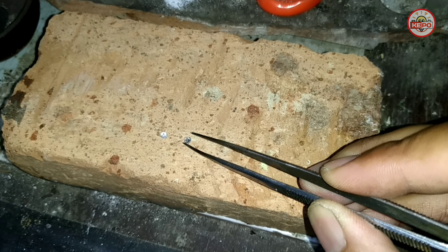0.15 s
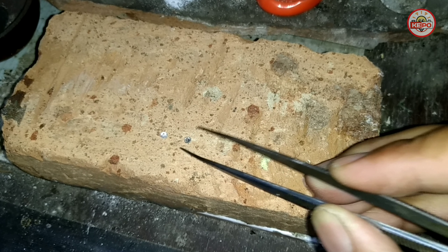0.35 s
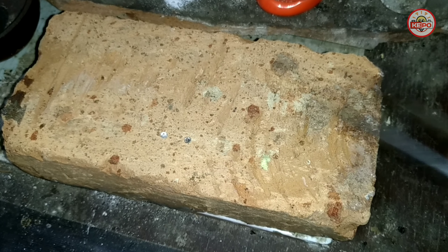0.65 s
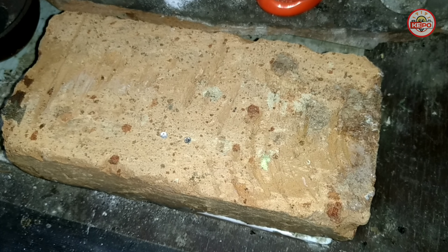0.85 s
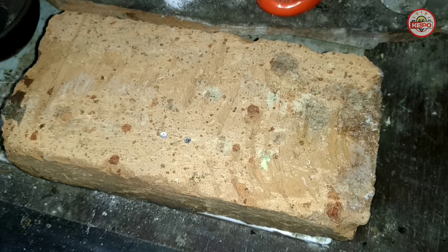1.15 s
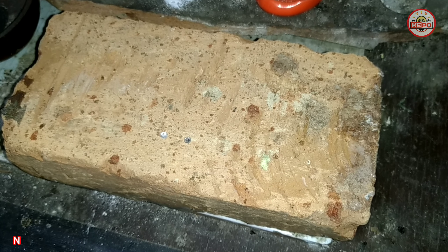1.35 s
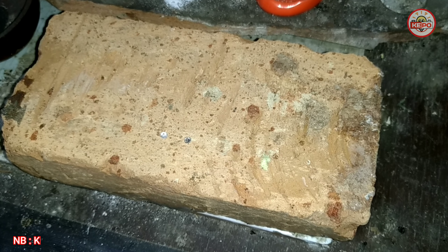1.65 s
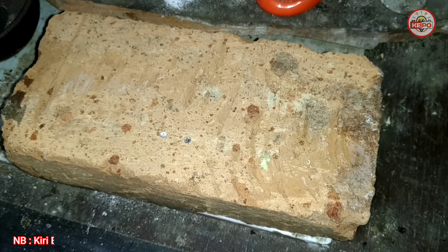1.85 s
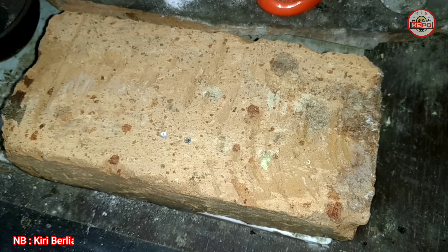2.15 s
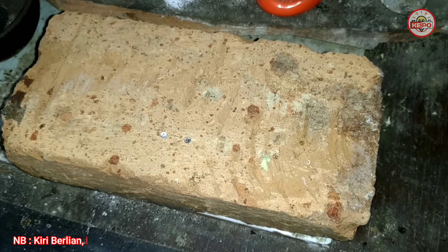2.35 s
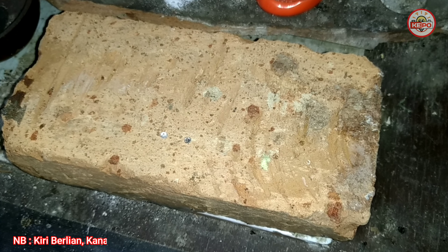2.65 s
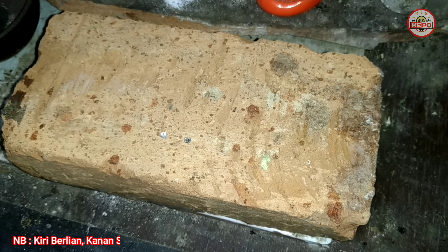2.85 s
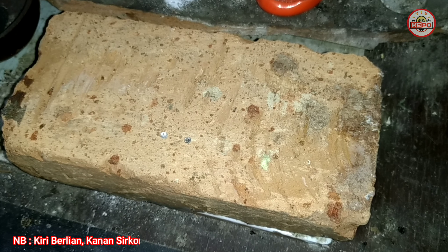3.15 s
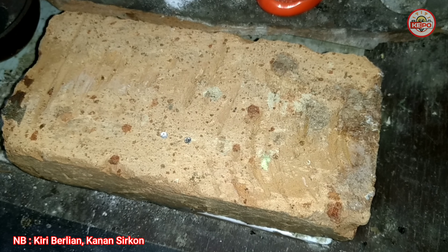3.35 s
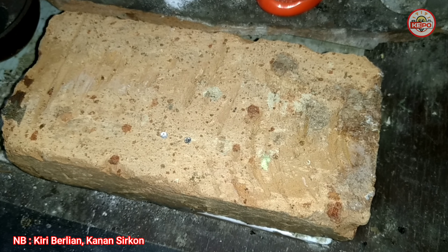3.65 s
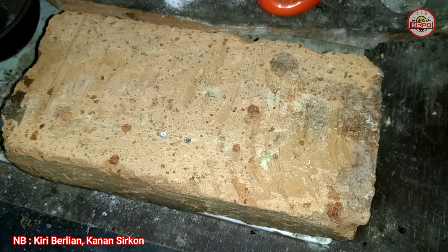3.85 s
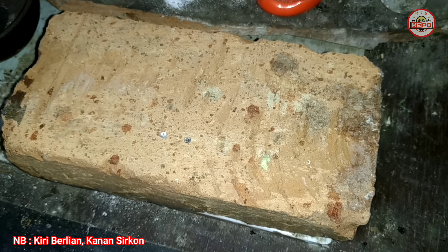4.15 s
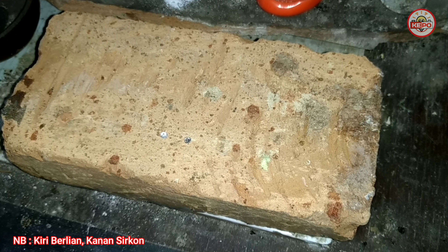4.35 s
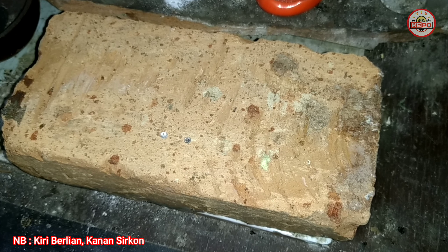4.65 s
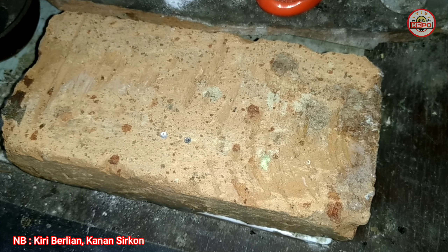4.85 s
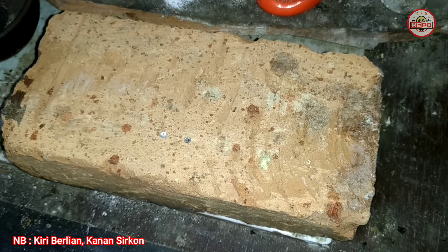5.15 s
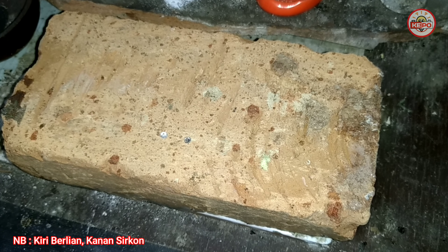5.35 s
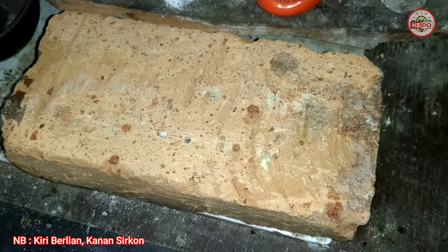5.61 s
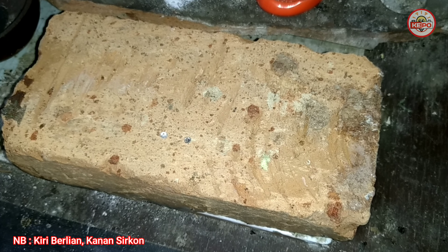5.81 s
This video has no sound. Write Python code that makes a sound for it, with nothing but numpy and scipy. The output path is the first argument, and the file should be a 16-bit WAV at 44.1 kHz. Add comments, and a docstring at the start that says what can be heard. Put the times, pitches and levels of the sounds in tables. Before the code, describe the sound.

Close up in a small room, metal tweezers land on a bench, clattering brightly and settling in a few dull taps. Quiet handling follows: scattered ticks, low bumps and the brush of hands. An object rubs unevenly along the bench and ends in a hollow wooden knock. Near the end, faint metallic pings and rustling sound over a rising low hum and rumble.

```python
"""Steel tweezers laid down on a workbench beside a brick: they clatter, bounce and rock to rest, each
contact ringing steel and bench together. Hands then shift small things about with clicks, soft bumps
and rustling; something slides, rubbing unevenly, and stops with a knock that sets metal ringing.
Heard from a close pair of microphones in a small room, with a low hum that swells near the end."""
import sys
import numpy as np
from scipy import signal
from scipy.fft import irfft, next_fast_len
from scipy.io import wavfile
from scipy.ndimage import uniform_filter1d

SR = 44100
rng = np.random.default_rng(int(sys.argv[2]) if len(sys.argv) > 2 else 0)


def to_wav(s):
    """Save 16-bit WAV."""
    ch = np.atleast_2d(s).T  # columns
    pcm = np.round(np.clip(ch, -1, 1) * 32767)  # PCM
    wavfile.write(sys.argv[1], SR, pcm.astype(np.int16))


N = 263718
TIME, HZ = np.arange(N) / SR, np.fft.rfftfreq(next_fast_len(N, True), 1 / SR)
BANDS_HZ, TOP_HZ = np.geomspace(60, 15000, 24), 15750

# The tweezers land, tips first, then flat; ring_factor shortens the ringing while fingers hold on:
# start_s, level_db, tilt_db_per_octave, t60_s, ring_db, ring_factor
LANDINGS = [(.3565, -20, -4, 0.071, -32, 0.45), (.3652, -25.5, -4.5, .11, -28, 0.69),
            (.371, -33, 4.5, 0.056, -47, 0.64), (.3775, -34, 3, 0.18, -37, 1),
            (.591, -40.5, -0.5, 0.079, -54, .55), (.606, -51, -2.5, 0.028, -34, 0.29),
            (.6135, -38, 5, 0.07, -33.5, 0.82), (.631, -41.5, 4.5, 0.093, -37, 0.45)]
# Crack of steel on the bench: frequency_hz, density_db
CLACK_COLOUR = [(60, -12.5), (130, -1.5), (250, -13), (370, 3), (620, -2.5), (1050, -6.5), (1700, -3),
                (2600, -15.5), (3300, -12.5), (4700, -25), (5700, -36.5), (8000, -61), (11000, -36),
                (15000, -58)]
# Bench and tweezers ringing together: pitch_hz, level_db, t60_s
CLATTER_MODES = [(371, -1.5, 0.065), (501, -21, 0.17), (588, -4.5, 0.2), (699, -1, 0.19), (791, 1, 0.18),
                 (892, -2.5, 0.16), (1175, -1, 0.06), (1313, -4, 0.15), (1390, -8.5, 0.19),
                 (1636, -1, 0.18), (1740, -2.5, 0.13), (1896, -12.5, 0.29), (1960, -13, 0.18),
                 (2360, -37, 0.28), (3080, -30, 0.12), (3120, -15, 0.16), (3010, -32, 0.15),
                 (3456, -17, 0.1), (4400, -44, .12)]


def tweezers(bands):
    """Close up and a little left, each bounce cracks against the bench and rings its modes."""
    out = np.zeros((2, N))
    octaves = np.log2(np.minimum(BANDS_HZ, 4500) / 1000)
    for start_s, db, tilt, t60, ring_db, ring_factor in LANDINGS + rocking():
        contact_s = 0.0002 * amp(-.7 * (db + 22.5))  # gentle contacts last longer
        gains = amp(db) * band_gains(read(CLACK_COLOUR, BANDS_HZ) + tilt * octaves)
        add(out, start_s, burst(bands, start_s, gains, t60, room_db=-21, rise_s=contact_s))
        modes = [(hz, mode_db + tilt * np.log2(hz / 1200), ring_s * ring_factor)
                 for hz, mode_db, ring_s in CLATTER_MODES]
        add(out, start_s, amp(ring_db) * ring(modes, rise_s=contact_s, scatter=0.97))
    bass_cut = signal.butter(2, 70.4, "highpass", fs=SR, output="sos")
    return signal.sosfilt(bass_cut, out) * lean_left(db=1.3)


# The tweezers settle on the bench top: start_s, strength_db
ROCK_CONTACTS = [(.654, 3.5), (.691, -2), (.732, -6.5), (.773, -4.5), (.809, -4)]


def rocking():
    """The tweezers rock to rest in light, dull contacts, given as rows like the landings."""
    tilt, t60, ring_factor = -3, .08, 0.72
    return [(start_s, db - 49.5, tilt, t60, db - 45, ring_factor) for start_s, db in ROCK_CONTACTS]


# Modes of steel tips, arms, rod and plate, and of a hollow cap and shell: pitch_hz, level_db, t60_s
TIP_MODES = [(4240, -2.5, 0.032), (4430, -4.5, 0.04), (7180, -34, 0.12)]
ARM_MODES = [(770, -3, 0.55), (855, -13, 0.76), (3130, 1, 0.079), (3990, -16.5, 0.51)]
ROD_MODES = [(4260, 0, 0.2), (4320, -5.5, 0.21), (6500, -7, 0.17), (9600, -11, 0.13)]
PLATE_MODES = [(2053, 2.5, 0.25), (2677, -1, 0.22), (3100, .5, 0.22), (3750, -9, 0.21), (4840, -5.5, 0.21)]
CAP_MODES = [(452, -7, 0.062), (1130, -17, 0.066), (3460, 1.5, 0.017), (5120, 0, 0.021)]
SHELL_MODES = [(1620, 2, 0.1), (2240, -9, .07), (2900, -15, 0.056), (4070, -4, 0.029)]
# Things left ringing on the bench: start_s, thing, level_db
PING_STRIKES = [(.372, "tips", -24.5), (.613, "arms", -37.5), (2.3305, "shell", -44.5),
                (3.3298, "cap", -34), (3.531, "shell", -45.5), (4.05, "rod", -61.5), (4.648, "rod", -47.5),
                (5.179, "plate", -61), (5.277, "plate", -67.5), (5.426, "plate", -50)]


def pings():
    """Struck steel and hollow things ring on in their own modes, a little left of centre."""
    modes = {"tips": TIP_MODES, "arms": ARM_MODES, "rod": ROD_MODES,
             "plate": PLATE_MODES, "cap": CAP_MODES, "shell": SHELL_MODES}
    out = np.zeros((2, N))
    for start_s, thing, db in PING_STRIKES:
        add(out, start_s, amp(db) * ring(modes[thing], rise_s=0.0011, scatter=1))
    return out * lean_left(db=1.5)


# The hollow wooden stop: pitch_hz, level_db, t60_s
STOP_MODES = [(85.2, -30.5, 0.34), (189.7, -30.5, 0.33), (282, -33, 0.049), (342, -1, 0.037),
              (319, -34.5, 0.37), (403.5, -27, 0.19), (511, -12, 0.042), (604, -34, 0.063),
              (821, -36, 0.11), (906, -34, 0.1)]
# Its reflections in the room: frequency_hz, density_db
WASH_COLOUR = [(60, 4), (130, -5.5), (240, 2), (420, -2), (700, -12.5), (950, -15), (1350, -26),
               (3000, -29.5), (5000, -35), (8000, -51), (15000, -73)]


def knock(bands, start_s):
    """The slide ends against a hollow stop; reflections thicken just after the blow."""
    out = np.zeros((2, N))
    add(out, start_s, ring(STOP_MODES, rise_s=0.0054, scatter=0, spread=.6))
    wash_s = start_s + .005
    gains = amp(-20.5) * band_gains(read(WASH_COLOUR, BANDS_HZ))
    add(out, wash_s, burst(bands, wash_s, gains, t60=.105, room_db=-15, rise_s=.009))
    return out


# Something pushed along the bench: start_s, end_s, level_db
PUSHES = [(4.03, 4.14, -59.5), (4.19, 4.3, -61), (4.3, 4.65, -52)]
# Resonances of the sliding thing: pitch_hz, width_hz, level_db
FRICTION_PEAKS = [(434, 100, 0), (776, 280, -12.5), (1142, 94, -2), (1650, 850, -17.5), (2315, 89, -6.5),
                  (3120, 2900, -25.5)]


def slide():
    """Uneven friction sings in a few resonances; a firmer grip is louder and slightly higher."""
    colour = sum(amp(db) * peak(hz, width) for hz, width, db in FRICTION_PEAKS)
    rub = noises([colour])[0]
    grip = wander(samples=1500)
    position = np.cumsum(1 + 0.0151 * grip)
    bent = np.array([np.interp(position, np.arange(N), side) for side in rub])
    return bent * strokes(PUSHES, rise=0.42, fall=0.12) * amp(1.04 * grip)


# Small things shifted near the microphones:
# start_s, level_db, tilt_db_per_octave, t60_s, pitch_hz, ring_db
TOUCHES = [(1.2455, -55.5, 0, 0.023, 3105, -51), (2.279, -59, -6, 0.19, 367, -33.5),
           (2.329, -49.5, -1.6, 0.028, 1536, -45), (2.4285, -66.5, 0.5, 0.079, 1570, -59),
           (3.117, -63.5, -3, 0.21, 1218, -45.5), (3.329, -49.5, 0.3, .05, 3000, -48.5),
           (3.385, -68.5, -6, 0.022, 693, -40), (3.4277, -60.5, -2.5, 0.058, 2674, -54),
           (3.531, -52.5, -1.5, .1, 1543, -40.5), (3.872, -65, -8, 0.18, 430, -47),
           (4.048, -59, -3.5, 0.24, 709, -40.5), (4.164, -65, -7, 0.25, 437, -62),
           (5.1183, -61.5, -6, 0.13, 758, -43), (5.179, -65.5, 1, 0.1, 3900, -58),
           (5.4242, -55.5, 1.5, 0.15, 3740, -49), (5.9508, -59.5, -4.5, .09, 680, -47)]
# Noise of one light contact: frequency_hz, band_db
TOUCH_COLOUR = [(60, -7.5), (150, -11.5), (350, -9.5), (1500, -5.5), (4000, -3), (5500, -4.5), (7800, -22),
                (11000, -6.5), (15000, -13.5)]


def clicks(bands):
    """Light contacts, dull or bright, each ring a short-lived cluster of modes."""
    out = np.zeros((2, N))
    octaves = np.log2(np.clip(BANDS_HZ, 380, 11000) / 2000)
    for start_s, db, tilt, t60, hz, ring_db in TOUCHES:
        contact_s = min(0.0014 * (t60 / 0.069) ** 1.47, .01)  # long scuffs also start softly
        gains = amp(db + 1.13 + read(TOUCH_COLOUR, BANDS_HZ) + tilt * octaves)
        add(out, start_s, burst(bands, start_s, gains, t60, room_db=-10, rise_s=contact_s))
        cluster = [(hz * 1.2, -8, .07), (hz, -2, .09), (hz * 0.68, -6, .08), (hz * 1.3, -11, .07)]
        add(out, start_s, amp(ring_db) * ring(cluster, rise_s=contact_s, scatter=0.86))
    return out * lean_left(db=.4)


# Grit on the bench: start_s, level_db, t60_s
CRACKLES = [(2.891, -61, .022), (2.997, -61, 0.054), (3.0234, -52.5, .05), (3.14, -55, 0.082),
            (3.1468, -49, 0.14)]
# Its fizz, close up: frequency_hz, band_db
CRACKLE_COLOUR = [(300, -17.5), (1500, -17), (4000, -10.5), (5500, -6.5), (7800, -22), (11000, 1),
                  (15000, -10.5)]


def grit(bands):
    """Grit crushed under something gives thin, fizzy crackles."""
    out = np.zeros((2, N))
    for start_s, db, t60 in CRACKLES:
        gains = amp(db + read(CRACKLE_COLOUR, BANDS_HZ))
        add(out, start_s, burst(bands, start_s, gains, t60, room_db=-12.5, rise_s=0.014 * t60))
    return out * lean_left(db=.4)


# Soft blows on the bench: start_s, pitch_hz, level_db, t60_s
BENCH_BUMPS = [(.362, 131.5, -37.5, 0.59), (0.605, 144.4, -37.5, 0.45), (0.698, 150.4, -40, 0.6),
               (.812, 151.6, -40, 0.77), (1.984, 110, -37, 0.052), (2.114, 142, -36.5, 0.1),
               (2.281, 187.2, -42.5, 0.5), (2.326, 152.4, -34.5, 0.41), (2.455, 97, -44, 0.13),
               (3.038, 79.4, -42, 0.61), (3.114, 63, -47.5, 0.25), (3.475, 90, -35, 0.13),
               (3.572, 69.1, -44.5, 0.9), (3.876, 73.8, -39.5, 0.36), (4.164, 96.4, -42, 0.41)]


def bumps():
    """Each soft bump sets the bench top swinging in one low mode."""
    out = np.zeros((2, N))
    for start_s, *mode in BENCH_BUMPS:
        add(out, start_s, ring([mode], rise_s=0.0056, scatter=0))
    return out


# Faint friction squeaks at the bench: start_s, end_s, pitch_hz, width_hz, level_db
SQUEAK_RUBS = [(3.884, 4.037, 1500, 71.4, -66.5), (4.192, 4.3, 449, 39.3, -55),
               (4.51, 4.65, 1158, 89.5, -55), (4.532, 4.67, 2312, 70, -59), (5.17, 5.356, 2040, 80, -67),
               (5.17, 5.31, 3060, 140, -69), (5.36, 5.536, 2000, 80, -66)]


def squeaks():
    """Rubbing keeps one narrow resonance sounding for a moment."""
    tones = noises([peak(hz, width) for _, _, hz, width, _ in SQUEAK_RUBS])
    return sum(tone * level([(on, db - 11), (on + 0.028, db), (off - .04, db), (off, db - 10)])
               for tone, (on, off, _, _, db) in zip(tones, SQUEAK_RUBS))


# Hands brush past things; the tweezers' tips graze brick and bench: start_s, end_s, level_db
HAND_STROKES = [(0, 1.0, -75), (1.0, 1.6, -73.5), (1.22, 1.5, -68.5), (1.48, 1.565, -62.5),
                (2.08, 2.78, -69), (2.82, 3.22, -65), (3.15, 4.6, -72.5), (4.05, 5.03, -67),
                (5.0, 5.51, -63.5), (5.34, 5.87, -59), (5.87, 6.1, -60)]
TIP_STROKES = [(0, 0.15, -61), (.1, 0.29, -66.5), (.305, 0.355, -63), (.565, .62, -65)]
# Each kind of rubbing, close up: frequency_hz, density_db
HAND_COLOUR = [(300, -14), (1000, 0), (2500, 2.5), (4500, 1.5), (6000, -3.5), (8000, -13.5), (11000, -5.5),
               (15000, -12)]
TIP_COLOUR = [(410, -35), (700, -7.5), (1030, -12), (1180, -3.5), (1380, 3), (1490, -10), (3900, -19.5),
              (4550, -18.5), (8870, -32), (15000, -26)]


def rubbing():
    """Skin and steel rub over surfaces with a grainy hiss."""
    grain = amp(0.76 * wander(samples=120))
    brushing = np.hypot(strokes(HAND_STROKES, rise=0.4, fall=0.76), amp(-76.5))  # never quite still
    hands = hiss(HAND_COLOUR) * brushing
    tips = amp(2) * hiss(TIP_COLOUR) * strokes(TIP_STROKES, rise=0.23, fall=0.45)
    return grain * (hands + tips)


# Rumble that rises with the hum: time_s, level_db
RUMBLE_RISE = [(4.0, -64), (4.5, -53.5), (5.25, -51.5), (5.6, -44.5), (5.82, -54.5), (5.98, -55)]
# Rumble through the bench: frequency_hz, density_db
SHAKE_COLOUR = [(25, -18), (42, -12.5), (58, 6.5), (95, 5), (125, 4.5), (155, -4), (210, -12.5),
                (320, -11.5), (600, -16.5), (1200, -46.5)]


def rumble():
    """The bench shakes after each bump, more after deep ones; late on, the rumble rises with the hum."""
    db_per_octave, rise_s, t60 = -5, 0.027, 0.93
    power = level(RUMBLE_RISE) ** 2
    for start_s, hz, db, _ in BENCH_BUMPS:
        age = np.maximum(TIME - start_s, 0)
        shake_db = db - 10 + db_per_octave * np.log2(hz / 100) - 60 * age / t60
        power += (amp(shake_db) * np.minimum(age / rise_s, 1)) ** 2
    return hiss(SHAKE_COLOUR) * np.sqrt(power)


# The room's faint hum: pitch_hz, level_db
HUM_TONES = [(57, -68.5), (101, -68.5), (156, -75.5), (479, -77), (527.6, -70)]
# Two low tones that swell: time_s, lower_db, upper_db
HUM_SWELL = [(4.3, -61.5, -85), (4.9, -55, -75), (5.12, -49, -73), (5.3, -65, -60), (5.45, -51, -47),
             (5.68, -52, -49), (5.82, -57, -55.5), (5.98, -48.5, -58)]
# Still air in the room: frequency_hz, density_db
AIR_COLOUR = [(25, -43), (42, -10), (58, -23), (100, -4), (173, -17), (270, -17), (440, -21), (530, -20.5),
              (760, -25.5), (1200, -25.5), (2100, -30.5), (5400, -43.5), (8000, -46), (11000, -42.5),
              (15500, -44)]


def room_tone():
    """Behind the bench sounds: still air, a faint wavering hum and a low one that swells."""
    steady = sum(amp(db) * waver(hz, drift_hz=1.65) for hz, db in HUM_TONES)
    lower = level([(s, db) for s, db, _ in HUM_SWELL]) * waver(hz=98.8, drift_hz=3.407)
    upper = level([(s, db) for s, _, db in HUM_SWELL]) * waver(hz=144, drift_hz=3.407)
    return amp(-62) * hiss(AIR_COLOUR) + steady + lower + upper


# Decay of the small room: frequency_hz, t60_s
ROOM_DECAY = [(100, 0.51), (500, 0.36), (1500, 0.43), (4000, 0.28), (12000, 0.28)]


def burst(bands, start_s, gains, t60, room_db, rise_s):
    """A blow into countless close modes: a quick decay, then the room's longer tail."""
    start = round(start_s * SR)
    part = bands[:, :, start:start + SR // 2]
    t = np.arange(part.shape[-1]) / SR
    direct = amp(-60 * t / t60)
    tail = amp(room_db - 60 * t / read(ROOM_DECAY, BANDS_HZ)[:, None])
    swell = 1 - np.exp(-t / (rise_s + 0.49 / BANDS_HZ[:, None]))  # bass builds up more slowly
    return np.einsum("bct,bt->ct", part, gains[:, None] * swell * np.hypot(direct, tail))


# How alike the left and right microphones sound: frequency_hz, correlation
MIC_LIKENESS = [(100, 0.98), (200, 0.8), (380, 0.65), (700, 0.3), (1400, -0.37), (2800, 0.16),
                (5000, -0.073), (12000, 0.11)]


def noises(gains):
    """Noise at the two microphones, one pair for each gain spectrum, rms 1."""
    left, other = rng.standard_normal((2, len(HZ))) + 1j * rng.standard_normal((2, len(HZ)))
    same = read(MIC_LIKENESS, HZ)
    pair = np.array([left, same * left + np.sqrt(1 - same ** 2) * other])
    return np.array([unit(irfft(pair * gain)[:, :N]) for gain in gains])


def ring(modes, rise_s, scatter, spread=1):
    """Dying modes; scatter is the chance in where they are struck."""
    t, out = np.arange(SR * 2 // 3) / SR, 0
    for hz, db, t60 in modes:
        # high modes reach the microphones out of step
        apart = spread * np.arccos(read(MIC_LIKENESS, hz)) * np.array([[-.5], [.5]])
        phase = 2 * np.pi * (hz * t + scatter * rng.uniform(-0.46, 0.38)) + apart
        out = out - amp(db - 60 * t / t60) * np.sin(phase)
    return out * (1 - np.exp(-t / rise_s))


def contact_bands():
    """Noise bands for the blows: near reflections comb them all alike, rough surfaces chatter."""
    comb = amp(4 * unit(uniform_filter1d(rng.standard_normal(len(HZ)), size=330)))
    passed = comb * (HZ > 45) * (HZ < TOP_HZ)
    shapes = [np.sqrt(read(list(zip(BANDS_HZ, row)), HZ)) for row in np.eye(len(BANDS_HZ))]
    bands = noises([shape * passed for shape in shapes])
    chatter_db = 1.23 * unit(uniform_filter1d(wander(samples=90), size=60))
    return bands * unit(amp(chatter_db))


def strokes(rows, rise, fall):
    """Gain of hand movements that swell, hold and let go; rise and fall are shares of their length."""
    power = np.zeros(N)
    for start, end, db in rows:
        progress = (TIME - start) / (end - start)
        ramp = np.clip(np.minimum(progress / rise, (1 - progress) / fall), 0, 1)
        power += (amp(db) * np.sin(np.pi / 2 * ramp)) ** 2
    return np.sqrt(power)


def hiss(colour):
    """Steady noise of one colour."""
    return noises([amp(read(colour, HZ))])[0]


def waver(hz, drift_hz):
    """A tone of rms 1 whose pitch wanders slightly."""
    pitch_hz = hz + drift_hz * wander(samples=5000)
    return np.sqrt(2) * np.sin(2 * np.pi * np.cumsum(pitch_hz) / SR)


def wander(samples):
    """Smoothed random motion, rms 1."""
    return unit(uniform_filter1d(rng.standard_normal(N), size=samples))


def peak(hz, width):
    """Gain spectrum of a steep resonance."""
    return 1 / (1 + (2 * (HZ - hz) / width) ** 2)


def band_gains(density_db):
    """Gain of each band from dB per Hz, with total power 1."""
    gains = amp(density_db) * np.sqrt(BANDS_HZ)
    return gains / np.linalg.norm(gains)


def read(points, hz):
    """Reads a curve on a log-frequency axis."""
    point_hz, value = np.transpose(points)
    return np.interp(np.log(hz + 1), np.log(point_hz + 1), value)


def level(curve):
    """Gain over time from rows of time_s, level_db; silent outside them."""
    s, db = np.transpose(curve)
    return amp(np.interp(TIME, s, db)) * (TIME >= s[0]) * (TIME <= s[-1])


def lean_left(db):
    """Gains that raise the left microphone and lower the right."""
    return amp([[db], [-db]])


def amp(db):
    """Decibels to gain."""
    return 10 ** (np.asarray(db) / 20)


def unit(x):
    """Scales to rms 1."""
    return x / np.sqrt(np.mean(x ** 2) + 1e-20)


def add(mix, start_s, sound):
    """Mixes a sound in at a time."""
    part = mix[:, round(start_s * SR):][:, :sound.shape[-1]]
    part += sound[..., :part.shape[1]]


def scene():
    """Everything on the bench, close to the microphones, over the room tone."""
    bands = contact_bands()
    contacts = tweezers(bands) + clicks(bands) + grit(bands) + bumps() + pings()
    sliding = slide() + knock(bands, start_s=4.633)
    return contacts + sliding + squeaks() + rubbing() + rumble() + room_tone()


def record(dry):
    """The recorder's band limit."""
    lowpass = signal.firwin(511, TOP_HZ, window=("kaiser", 9), fs=SR)
    return signal.oaconvolve(dry, lowpass[None], "same")


dry = scene()
out = record(dry)
to_wav(out)
```